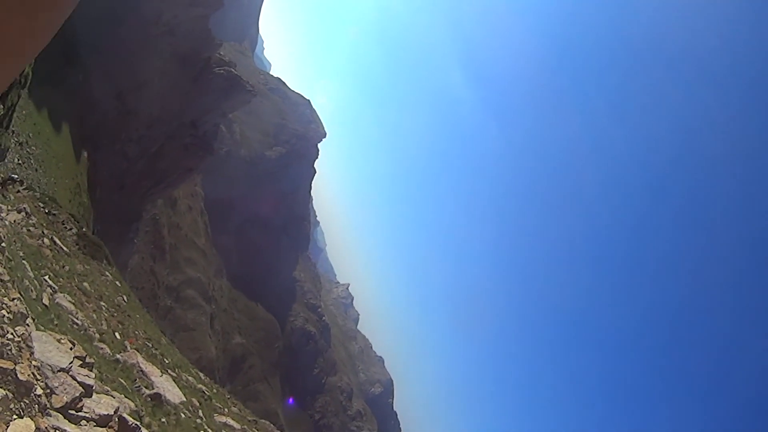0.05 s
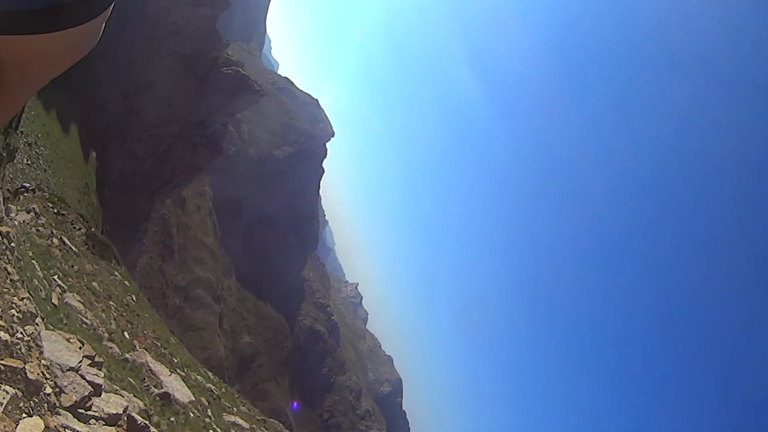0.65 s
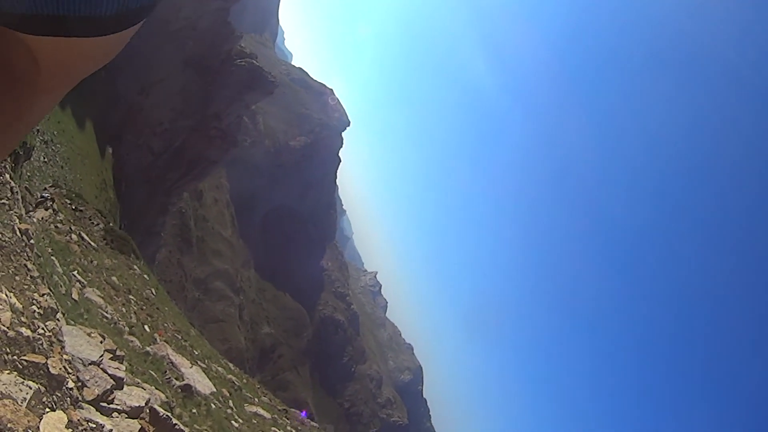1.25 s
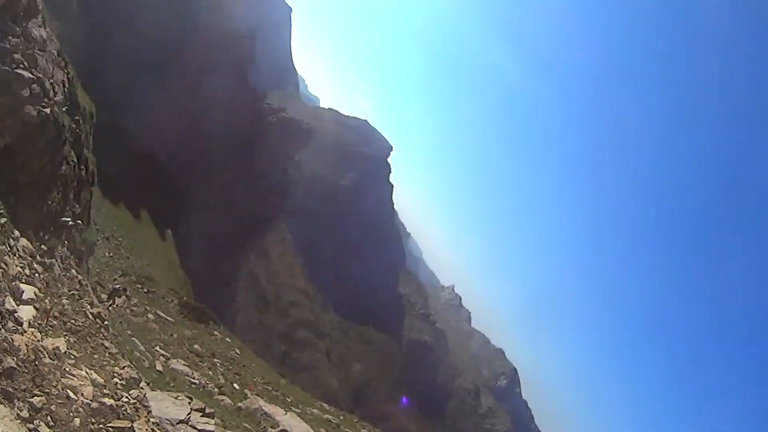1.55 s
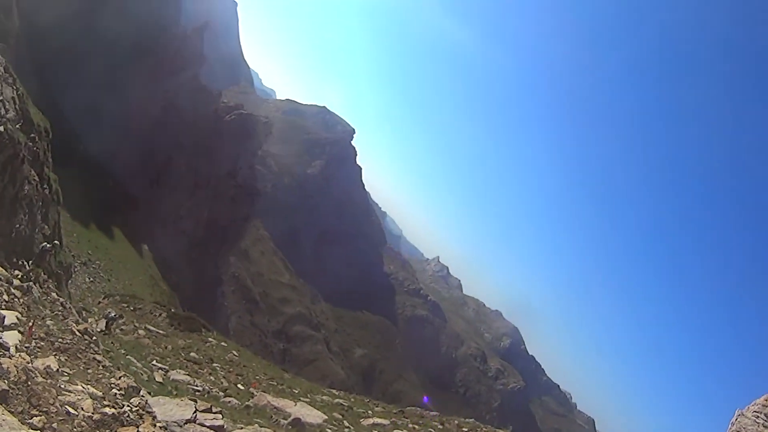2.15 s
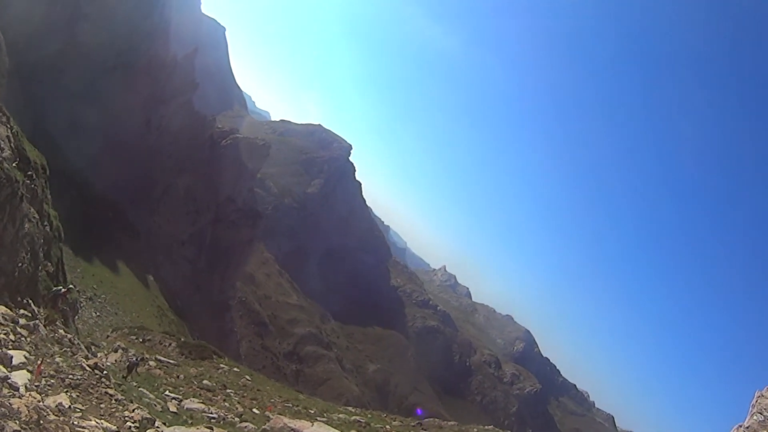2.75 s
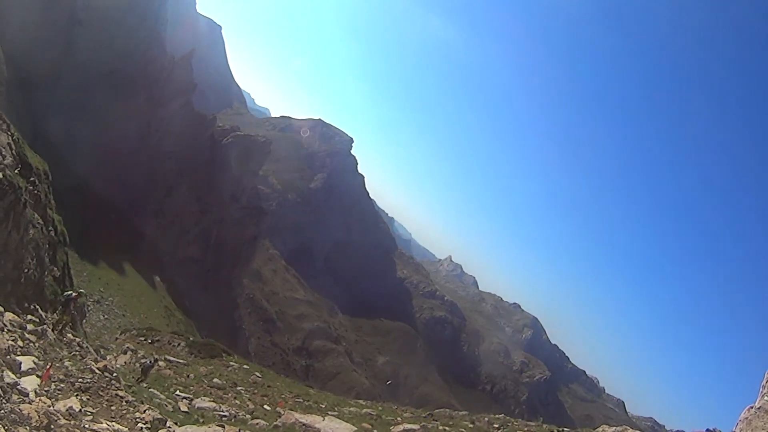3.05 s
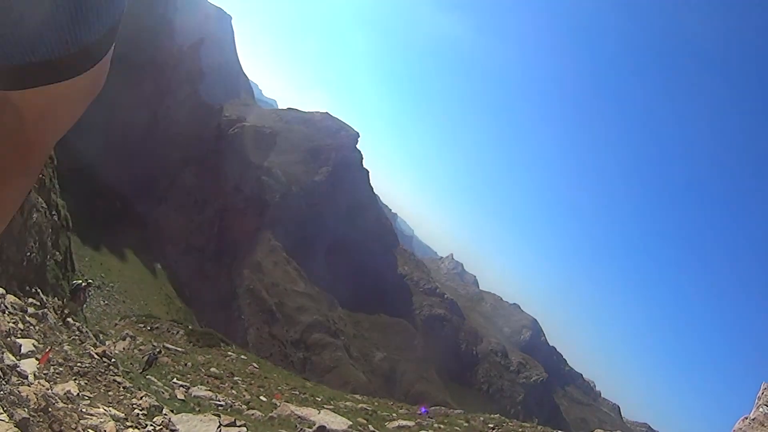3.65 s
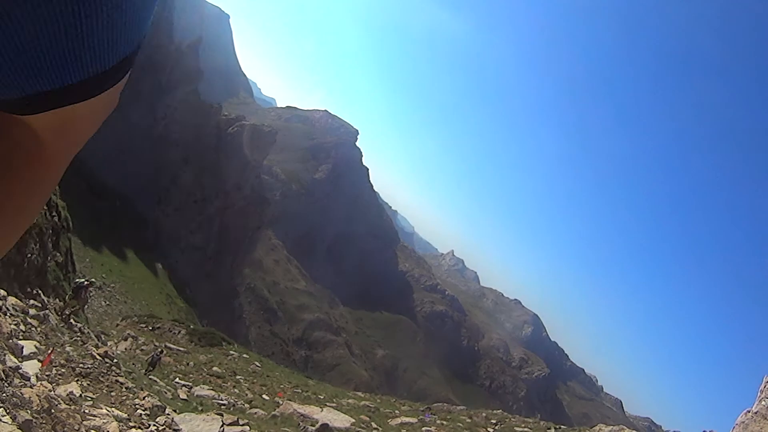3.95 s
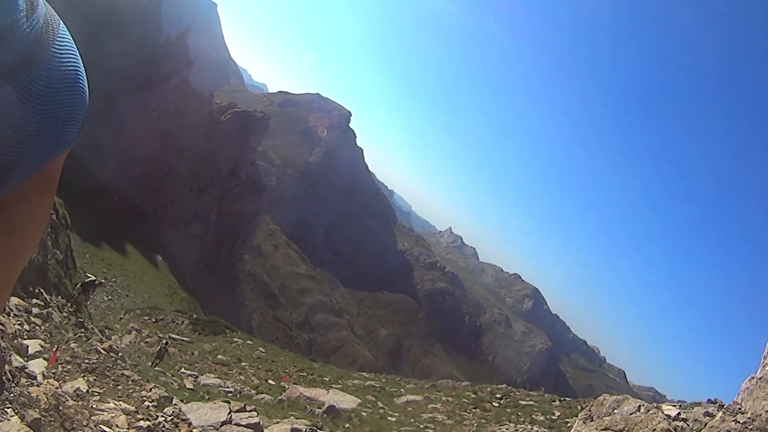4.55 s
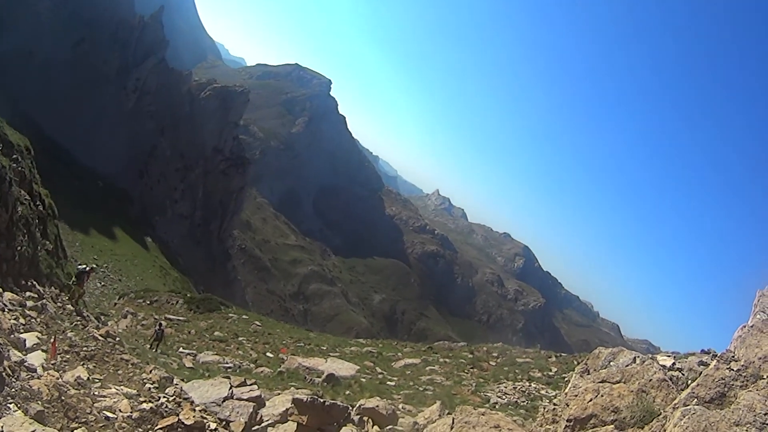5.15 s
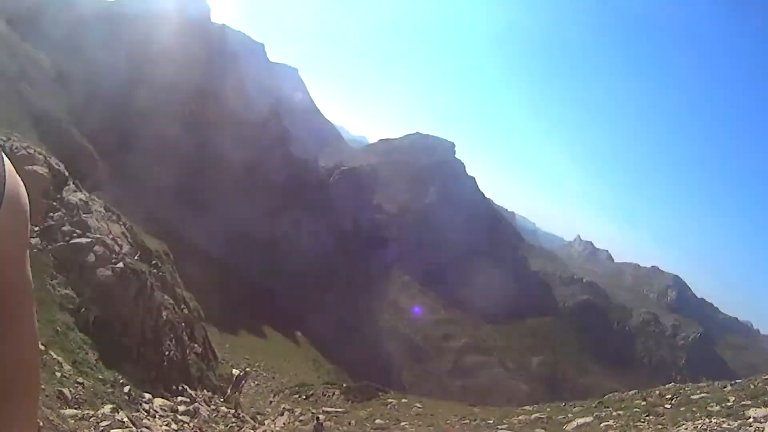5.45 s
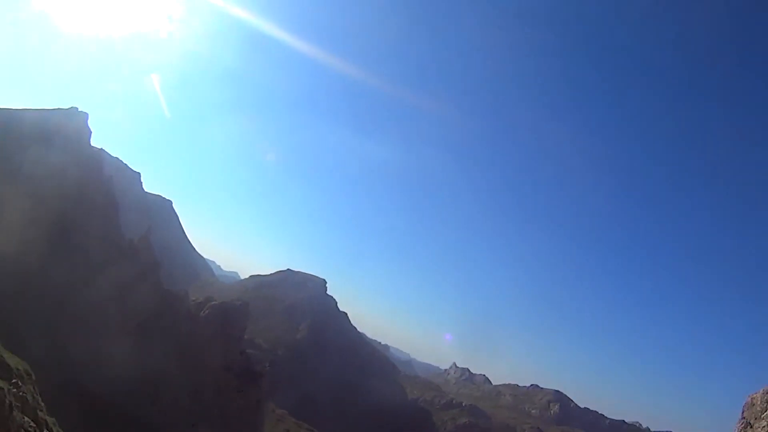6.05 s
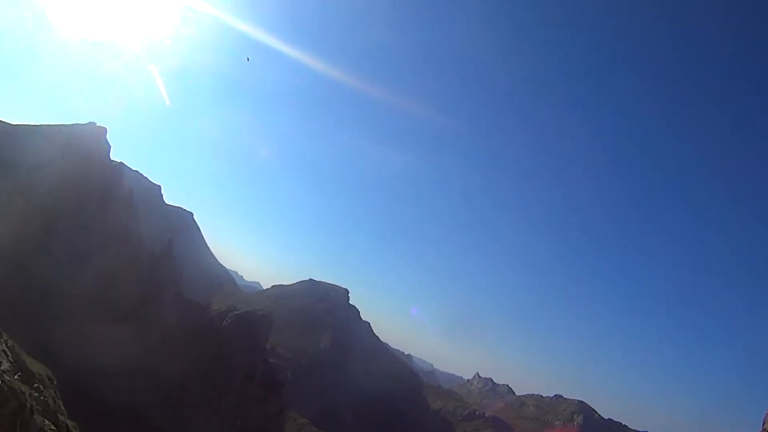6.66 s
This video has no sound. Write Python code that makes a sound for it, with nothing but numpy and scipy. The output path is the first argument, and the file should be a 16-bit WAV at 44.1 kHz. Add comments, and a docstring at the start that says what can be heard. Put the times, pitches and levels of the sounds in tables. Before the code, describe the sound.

Shoes crunch, knock and scrape over loose stones in an uneven climb, with skipping pebbles, low thumps and light wind.

```python
"""Shoes climb over loose mountain scree, grinding stones together and knocking on them.
Each contact clacks in the stone, thuds in the sole and crackles in the grit. Short tones ring
underfoot, pebbles skip away and heavy steps jolt a small camera held low beside the legs.
All is heard through its boxy housing, over trickling grit and a little wind."""
import sys
import numpy as np
from scipy import signal
from scipy.fft import rfft, irfft, next_fast_len
from scipy.io import wavfile
from scipy.ndimage import uniform_filter1d, map_coordinates

SR = 44100
rng = np.random.default_rng(int(sys.argv[2]) if len(sys.argv) > 2 else 0)


def wrap_up_sound(samples):
    """Save the sound to the file named by the first command line argument, as 16-bit audio."""
    columns = np.atleast_2d(samples).T
    # keep every value between -1 and 1, then stretch to whole-number steps
    tamed = np.clip(columns, -1, 1)
    steps = np.round(tamed * 32767).astype(np.int16)
    wavfile.write(sys.argv[1], SR, steps)


N = 299862


def amp(db):
    """Decibels to gain."""
    return 10 ** (np.asarray(db) / 20)


def unit_rms(x):
    """Scale to rms 1."""
    return x / np.sqrt(np.mean(x ** 2) + 1e-20)


def curve_at(points, hz):
    """Interpolate (Hz, value) points on a log frequency axis."""
    knots_hz, values = np.transpose(points)
    return np.interp(np.log(hz + 1), np.log(knots_hz + 1), values)


def wobble(rate_hz, size=N):
    """Smooth random curve, rate_hz knots a second."""
    steps = np.linspace(0, size * rate_hz / SR, size // 16)
    knots = rng.standard_normal(int(size * rate_hz / SR) + 4)
    return np.interp(np.arange(size) * rate_hz / SR, steps, map_coordinates(knots, [steps]))


def add(track, start_s, sound):
    """Mix a sound into a track."""
    span = track[max(round(start_s * SR), 0):][:len(sound)]
    span += sound[:len(span)]


def filtered(x, response):
    """Apply a response given as a function of Hz."""
    size = 2 * next_fast_len(x.shape[-1] // 2 + 1024)
    hz = np.fft.rfftfreq(size, 1 / SR)
    return irfft(rfft(x, size) * response(hz), size)[..., :x.shape[-1]]


def minimum_phase(gain):
    """Response with this gain that rings only after the blow."""
    cepstrum = irfft(np.log(np.maximum(gain, 1e-6)))
    half = len(cepstrum) // 2
    cepstrum[1:half] *= 2
    cepstrum[half + 1:] = 0
    return np.exp(rfft(cepstrum))


def scatter(x, t60_s, rate_hz):
    """Crossfade at random among four short echo paths."""
    t = np.arange(SR // 50) / SR
    paths = rng.standard_normal((4, len(t))) * amp(-60 * t / t60_s)
    paths /= np.linalg.norm(paths, axis=1, keepdims=True)
    shares = np.array([wobble(rate_hz, len(x)) for _ in paths])
    echoes = signal.oaconvolve(x[None], paths, axes=1)[:, :len(x)]
    return np.sum(echoes * shares, axis=0) / np.linalg.norm(shares, axis=0)


def slips(size, rate_hz, spread_db, sand):
    """Force of tiny, uneven stick-slip contacts over sand noise."""
    strengths = amp(spread_db * np.minimum(rng.exponential(size=size), 3))
    signs = rng.choice([-1, 1], size)
    hits = rng.random(size) < rate_hz / SR
    return unit_rms(strengths * signs * hits) + sand * rng.standard_normal(size)


# Stone on stone through the housing. Each row: frequency in Hz, gain in dB.
STONE_SPECTRUM = [(90, 3.5), (200, 3), (320, 4.5), (450, 0), (800, -3.5), (1200, -9.5), (1570, -1.5),
                  (1820, -9), (2250, -17), (3150, -10.5), (3750, -19.5), (4950, -12.5), (6400, -23),
                  (10800, -23.5)]


def stone_band(force, low_hz, high_hz, resonances=((1, 0),)):
    """One band of the response of stones and housing to a contact force."""
    def response(hz):
        band = 1 / np.sqrt((1 + (low_hz / (hz + 1)) ** 8) * (1 + (hz / high_hz) ** 8))
        gain_db = curve_at(STONE_SPECTRUM, hz) + curve_at(resonances, hz)
        return minimum_phase(amp(gain_db) * band)
    return filtered(force, response)


def contact_voices(force):
    """Stone clack, sole thud and grit crackle; every stone has its own resonances."""
    resonances = np.column_stack([np.geomspace(150, 11000, 56), rng.normal(0, 2.8, 56)])  # Hz, dB
    clack = force + .8 * scatter(force, t60_s=.009, rate_hz=90)
    crackle = scatter(force, t60_s=.007, rate_hz=250)
    stone = stone_band(clack, 482, 2063, resonances)
    sole = stone_band(force, 51, 350, resonances)
    grit = stone_band(crackle, 3140, 7330, resonances)
    return stone, sole, grit


# Stereo width. Each row: frequency in Hz, side gain in dB.
SIDE_SPECTRUM = [(90, -8.5), (300, 1.5), (1000, 1.5), (1600, -4), (2750, 4.5), (4700, -5), (8000, -0.5)]


def microphone_ports(mid):
    """The housing shakes its two ports out of step; paths off the stones shift as the feet move."""
    quadrature = np.imag(signal.hilbert(mid, next_fast_len(N)))[:N]
    side = .68 * scatter(mid, t60_s=.012, rate_hz=30) + .73 * quadrature
    side = filtered(side, lambda hz: amp(curve_at(SIDE_SPECTRUM, hz)))
    return np.array([mid + side, mid - side])


# Wind rumble and hiss. Each row: frequency in Hz, relative level in dB.
WIND_SPECTRUM = [(12, -9), (20, -2), (43, -2.5), (65, -14.5), (115, -17.5), (300, -43), (390, -54),
                 (660, -120)]
HISS_SPECTRUM = [(150, 17.5), (330, 9.5), (600, -1), (1150, -15), (1620, 8), (2250, -4.5), (3150, -3.5),
                 (3800, -7.5), (5000, -9), (6500, -6.5), (11000, -9.5)]


def air():
    """Light wind rumbles on the housing over a thin hiss."""
    common, left, right = rng.standard_normal((3, N))
    buffeting = common + 0.093 * np.array([left, right])
    wind = filtered(buffeting, lambda hz: amp(curve_at(WIND_SPECTRUM, hz)))
    hiss = filtered(rng.standard_normal((2, N)), lambda hz: amp(curve_at(HISS_SPECTRUM, hz)))
    return unit_rms(wind) * amp(-40 + 0.75 * wobble(rate_hz=4.3)) + unit_rms(hiss) * amp(-52)


# Grit sifting between steps. Each row: time in seconds, base level in dB.
TRICKLE_LEVELS = [(0.0, -65), (0.53, -58), (0.95, -44.5), (1.13, -69), (1.32, -45.5), (1.78, -56.5),
                  (1.95, -40), (2.42, -63.5), (2.76, -48.5), (3.29, -60.5), (3.56, -65), (4.05, -53.5),
                  (4.43, -51), (5.28, -45.5), (5.43, -51.5), (6.48, -66), (6.8, -49)]


def trickle():
    """Grit and gravel shift in clumps; each scrape loosens more, which then settles."""
    loosened_db, settle_t60_s = -28, 0.45
    t = np.arange(N) / SR
    power = amp(np.interp(t, *np.transpose(TRICKLE_LEVELS))) ** 2
    for start_s, length_s, stone_db, *_ in SHOE_SCRAPES:
        loosened = amp(stone_db + loosened_db - 60 * t[:SR] / settle_t60_s)
        add(power, start_s + length_s, loosened ** 2)
    level = np.sqrt(power) * amp(2.5 * wobble(rate_hz=35))
    grains = slips(N, rate_hz=900, spread_db=5, sand=1.4)
    sifting = scatter(grains, t60_s=.007, rate_hz=120)
    grit = unit_rms(stone_band(sifting, 1200, 8200))
    gravel = unit_rms(stone_band(sifting, 173, 1230))
    return level * (grit + gravel) * amp(-1.5)


# Body weight landing. Each row: start in seconds, pitch in Hz, level in dB.
CAMERA_JOLTS = [(0.644, 67, -18), (0.89, 82.5, -13), (0.939, 49, -15), (1.107, 88, -19.5),
                (1.422, 116, -17), (1.454, 45, -9), (1.817, 69.6, -13.5), (2.28, 160, -29),
                (2.99, 48.4, -24.5), (3.735, 83, -21), (4.255, 95, -15.5), (5.013, 122, -20),
                (5.298, 59.6, -12.5), (5.827, 87.5, -20), (6.041, 80.6, -9), (6.081, 42.8, -7.5),
                (6.733, 300, -22)]


def jolts():
    """A heavy landing swings the camera at a low, sagging pitch; slower swings last longer."""
    t60_cycles, attack_s, sag_s = 8.5, 0.0014, 0.0038
    out, t = np.zeros(N), np.arange(SR // 3) / SR
    attack = 1 - np.exp(-t / attack_s)
    sag = 1 + 0.086 * np.exp(-t / sag_s)
    for start_s, hz, db in CAMERA_JOLTS:
        swing = np.sin(2 * np.pi * np.cumsum(hz * sag) / SR)
        add(out, start_s, swing * amp(db - 60 * t * hz / t60_cycles) * attack)
    return out


# Skipping pebbles. Each row: start in seconds, level in dB, pitch in Hz.
PEBBLE_SKIPS = [(0.064, -37, 1760), (0.246, -33.5, 1650), (0.319, -37, 1640), (0.982, -53, 2600),
                (1.126, -23, 2980), (1.143, -34, 1940), (1.188, -28, 1760), (1.205, -33, 1620),
                (1.318, -18, 1800), (1.746, -27, 1900), (2.489, -25.5, 2080), (2.591, -22.5, 1980),
                (2.844, -27, 1845), (2.88, -27.5, 1860), (2.932, -28, 2000), (2.979, -24, 3470),
                (3.949, -25.5, 2920), (4.734, -42, 1800), (5.666, -22.5, 1695), (5.749, -34.5, 1755),
                (5.983, -9.5, 1620), (6.044, -16, 1620)]


def pebbles():
    """A pebble hits the rock and chatters briefly, clinking at its own pitch."""
    chatter_t60_s = 0.06
    out, t = np.zeros(N), np.arange(SR // 12) / SR
    impact = t == 0
    for start_s, db, hz in PEBBLE_SKIPS:
        chatter = slips(len(t), rate_hz=400, spread_db=4, sand=0.78) * amp(-60 * t / chatter_t60_s)
        resonances = [(hz * .6, -6), (hz, 6), (hz * 1.3, -4), (9000, -1)]
        clink = stone_band(impact + 0.078 * chatter, 925, 6950, resonances)
        add(out, start_s, clink / np.abs(clink).max() * amp(db))
    return out


# Modes of one ring. Each row: ratio to the pitch, gain in dB, t60 in seconds.
RING_MODES = [(0.28, -19.5, 0.6), (0.761, -16, 0.19), (0.908, -2, 0.14), (0.998, 5.5, 0.11),
              (1.48, -11.5, 0.12), (1.572, -11, 0.1), (1.86, -23.5, 0.39)]
# Rings underfoot. Each row: start in seconds, pitch in Hz, level in dB.
UNDERFOOT_RINGS = [(0.783, 333.6, -25), (1.315, 315, -16), (1.45, 728, -27.5), (2.168, 720, -21),
                   (2.392, 650, -25), (2.644, 295, -26.5), (2.688, 291.6, -15), (2.745, 309, -20.5),
                   (3.11, 330, -31), (3.225, 337.6, -24.5), (4.905, 733, -16.5), (5.134, 330, -25),
                   (5.372, 775, -12.5), (5.667, 714, -29)]


def underfoot_rings():
    """Short pitched rings: hollow sole tones near 300 Hz, higher stony rings near 700 Hz."""
    attack_s = 0.0059
    out, t = np.zeros(N), np.arange(SR // 2) / SR
    attack = 1 - np.exp(-t / attack_s)
    for start_s, hz, db in UNDERFOOT_RINGS:
        for ratio, mode_db, t60_s in RING_MODES:
            envelope = amp(db + mode_db + rng.normal(0, 1) - 60 * t / t60_s) * attack
            add(out, start_s, envelope * np.sin(2 * np.pi * (hz * ratio * t + rng.random())))
    return out


# Shoe or stone strikes. Each row: start in seconds, stone, sole and grit levels in dB,
# crumbling time in seconds.
STONE_KNOCKS = [(0.638, -22.5, -25, -53, 0.029), (0.782, -29, -21.5, -64, 0.035),
                (0.887, -26.5, -16, -36, 0.082), (1.058, -27.5, -28.5, -41.5, 0.079),
                (1.108, -35, -19.5, -58, 0.039), (1.312, -28, -20, -70, 0.03),
                (1.433, -22, -29, -59, 0.036), (1.51, -31, -20, -40, 0.058),
                (1.777, -40.5, -23, -42.5, 0.025), (1.815, -37.5, -25, -48.5, 0.15),
                (1.867, -19, -26, -44, 0.071), (2.166, -23.5, -19, -45.5, 0.053),
                (2.351, -25, -22, -39, 0.043), (2.386, -25, -17.5, -59, 0.056),
                (2.689, -20.5, -26, -33.5, 0.071), (3.221, -31.5, -33.5, -42, 0.1),
                (3.463, -45, -37.5, -61, .061), (3.732, -20, -20.5, -29, 0.069),
                (4.057, -19.5, -27, -36.5, 0.049), (4.098, -24, -22.5, -41, 0.059),
                (4.124, -17, -24, -27.5, 0.047), (4.183, -26.5, -33.5, -35.5, 0.046),
                (4.258, -20, -17.5, -33, 0.11), (4.505, -23.5, -16, -37.5, 0.049),
                (4.561, -30, -29, -44.5, 0.049), (4.604, -21.5, -34, -42, 0.083),
                (4.819, -21, -22.5, -28.5, 0.053), (4.835, -26, -24, -36.5, 0.049),
                (4.936, -27, -39, -29, 0.076), (5.216, -25, -19, -32.5, 0.063),
                (5.578, -41, -25, -56, 0.045), (5.667, -24, -41, -65, 0.011),
                (5.956, -20.5, -23.5, -41.5, 0.092), (5.982, -30, -22, -49, .05),
                (6.071, -20, -31, -71, 0.023), (6.732, -30.5, -17.5, -43, 0.046)]


def knocks():
    """A brief graze, a hard contact, then a dying shower of smaller ones as the stones settle."""
    shower_gain_per_s, hold_share = 1.85, 0.041
    grit_t60_s, energy_window_s = 0.27, .01
    out, t = np.zeros(N), np.arange(-SR // 100, SR // 6) / SR
    impact = t == 0
    for start_s, *levels_db, crumble_s in STONE_KNOCKS:
        age = t / crumble_s
        envelope = amp(-60 * np.where(t < 0, -5 * age, np.maximum(age - hold_share, 0)))
        shower = slips(len(t), rate_hz=1500, spread_db=1.5, sand=0.21) * envelope
        stone, sole, grit = contact_voices(impact + shower_gain_per_s * crumble_s * shower)
        grit *= amp(-60 * np.maximum(t, 0) / grit_t60_s)  # extra fade: grit dies first
        for voice, db in zip((stone, sole, grit), levels_db):
            normalized = voice / np.linalg.norm(voice) * np.sqrt(energy_window_s * SR)
            add(out, start_s + t[0], normalized * amp(db))
    return out


# Grinding strokes. Each row: start in seconds, length in seconds, stone, sole and grit levels in dB,
# swell over the stroke in dB.
SHOE_SCRAPES = [(0.73, 0.42, -41, -46.5, -52.5, -1), (0.884, 0.063, -29, -27, -44.5, -7.5),
                (1.086, 0.029, -22, -26.5, -40.5, -1.5), (1.259, 0.14, -36, -32, -80, 0.5),
                (1.351, 0.051, -19.5, -24.5, -33, 3.5), (1.414, 0.036, -23.5, -18, -45, 1),
                (1.466, 0.15, -46, -50, -52.5, -8), (1.865, 0.099, -18, -28.5, -33, -3),
                (1.98, 0.017, -23, -24, -28.5, 2.5), (2.276, 0.057, -26.5, -21.5, -38, 3),
                (2.342, 0.083, -33, -46, -42, -1.5), (2.628, .04, -37, -34.5, -44.5, -3.5),
                (2.733, 0.041, -27, -44, -38, -2), (3.102, 0.025, -36, -35, -48, -5.5),
                (3.218, 0.081, -38.5, -38.5, -54.5, -16), (3.555, 0.025, -34.5, -36.5, -47.5, -2),
                (3.616, 0.054, -46.5, -44.5, -61, -6), (3.789, 0.02, -55, -61, -49, -1),
                (4.018, 0.14, -42, -40.5, -54.5, 3), (4.637, 0.068, -31.5, -35.5, -45.5, -7.5),
                (4.863, 0.085, -23.5, -29, -36, 9), (5.107, 0.11, -34.5, -36, -44.5, -2.5),
                (5.209, 0.082, -20, -22.5, -33.5, 4), (5.324, 0.052, -15.5, -21.5, -28, -2),
                (5.885, 0.085, -48, -41, -57.5, -8), (5.976, 0.093, -26, -31, -45, 6.5),
                (6.087, 0.035, -30, -28.5, -45, -6), (6.132, 0.061, -67, -36.5, -74, -2),
                (6.742, 0.054, -43, -60, -48, -10)]


def scrapes():
    """The shoe drags stones over each other: it bites, catches and slips, then stops abruptly."""
    bite_s, jerk_db = 0.014, 1
    stops_t60_s = (0.083, 0.092, 0.033)  # stone, sole, grit
    arches_db = (2.5, -2.5, 1)  # the sole presses at the ends; stone and grit slide between
    out, t = np.zeros(N), np.arange(-SR // 200, SR // 4) / SR
    for start_s, length_s, *levels_db, swell_db in SHOE_SCRAPES:
        progress = np.clip(t / length_s, 0, 1)
        push_db = swell_db * (progress - .5) + 60 * np.minimum(t, 0) / bite_s
        arch = np.sin(np.pi * progress) - 2 / np.pi
        jerks = amp(jerk_db * wobble(rate_hz=130, size=len(t)))
        force = jerks * slips(len(t), rate_hz=1050, spread_db=5.5, sand=.4)
        for voice, db, arch_db, t60_s in zip(contact_voices(force), levels_db, arches_db, stops_t60_s):
            power = np.abs(uniform_filter1d(voice ** 2, size=1100))
            steady = voice / np.sqrt(power + 1e-12)  # foot pressure alone sets the power
            pressure_db = db + push_db + arch_db * arch - 60 * np.maximum(t - length_s, 0) / t60_s
            add(out, start_s + t[0], steady * amp(pressure_db))
    return out


def scene():
    """Footwork on scree in open air, slightly louder on the left."""
    footwork = scrapes() + knocks() + pebbles() + underfoot_rings() + trickle() + jolts()
    return (microphone_ports(footwork) + air()) * amp([[.3], [-.3]])


def record(dry):
    """The camera rounds off the highest peaks and cuts the top treble."""
    ceiling, cutoff_hz = .95, 11100
    rounded = dry / (1 + np.abs(dry / ceiling) ** 6) ** (1 / 6)
    return filtered(rounded, lambda hz: 1 / (1 + (hz / cutoff_hz) ** 80))


dry = scene()
out = record(dry)
wrap_up_sound(out)
```